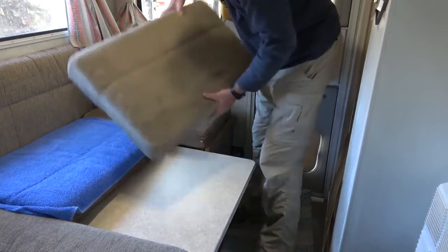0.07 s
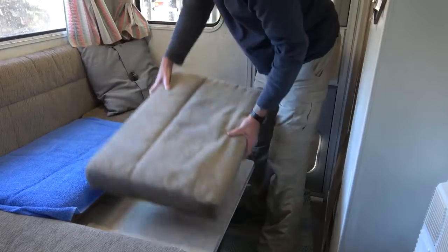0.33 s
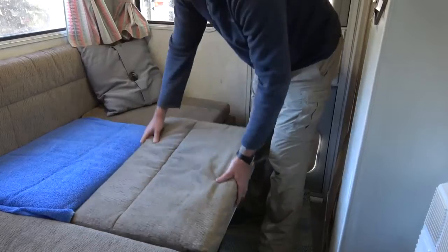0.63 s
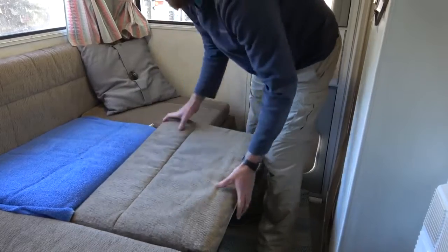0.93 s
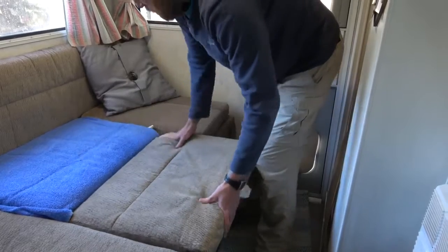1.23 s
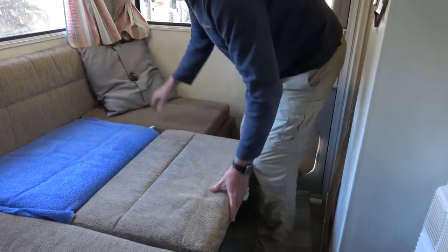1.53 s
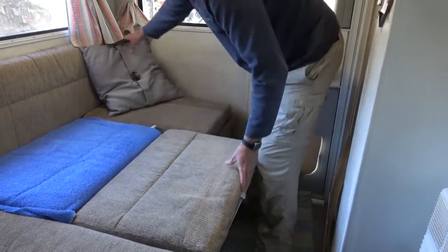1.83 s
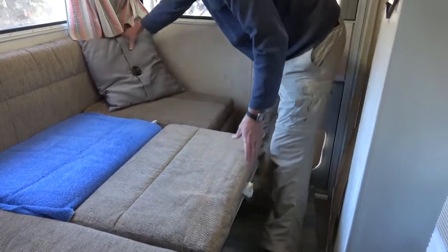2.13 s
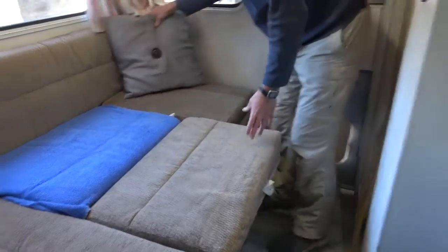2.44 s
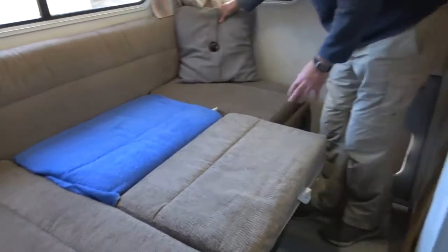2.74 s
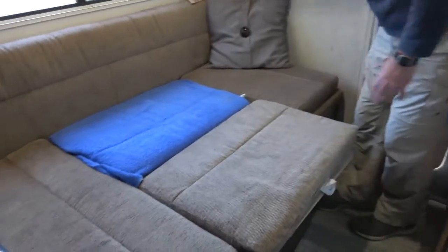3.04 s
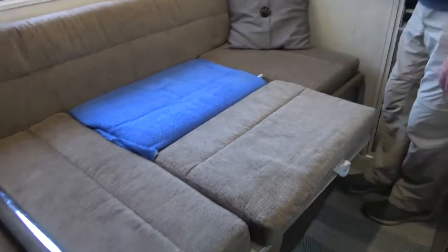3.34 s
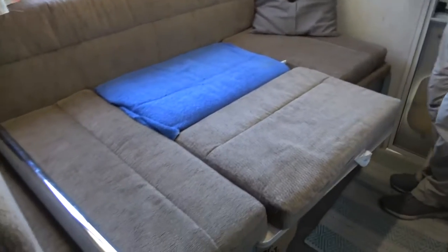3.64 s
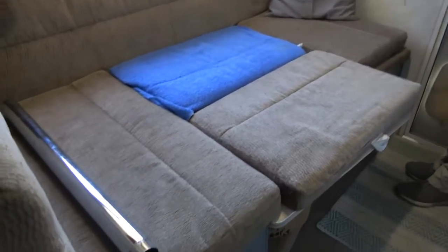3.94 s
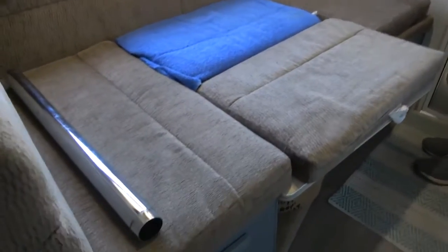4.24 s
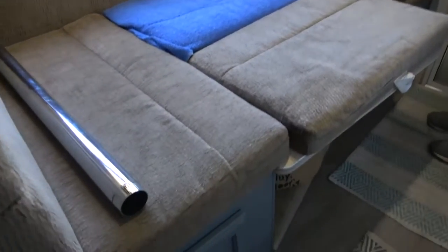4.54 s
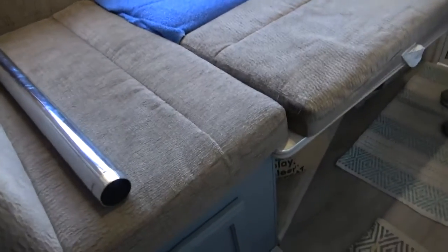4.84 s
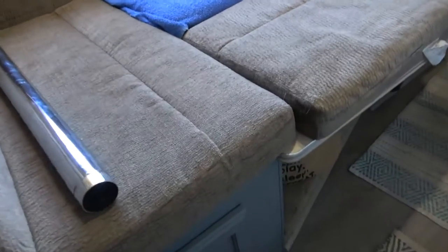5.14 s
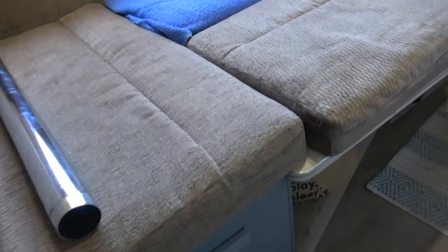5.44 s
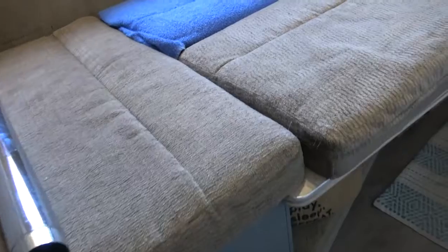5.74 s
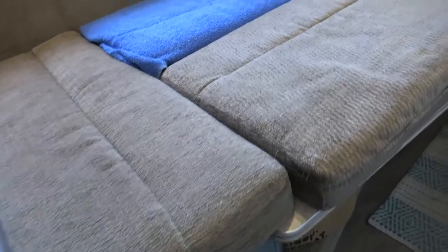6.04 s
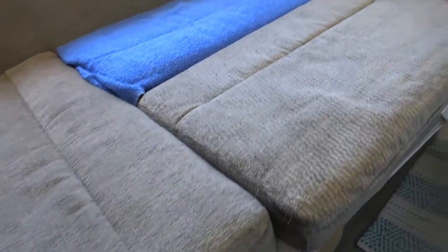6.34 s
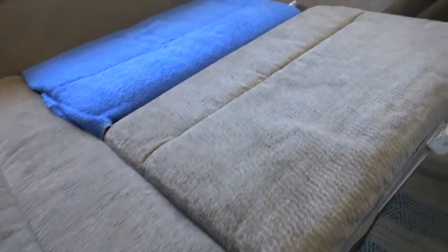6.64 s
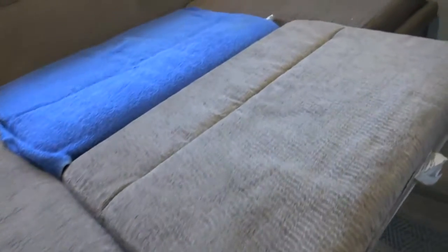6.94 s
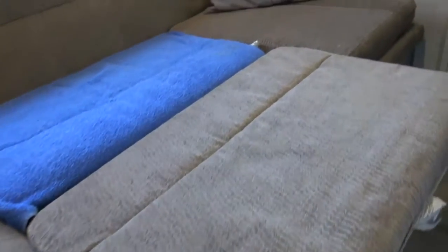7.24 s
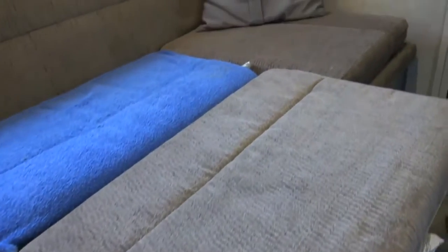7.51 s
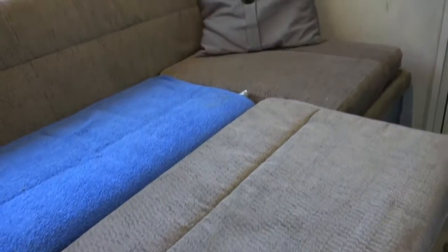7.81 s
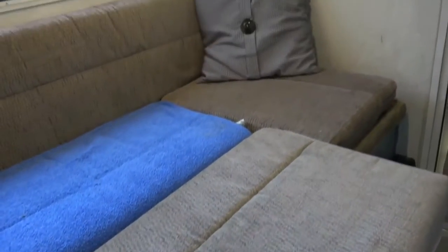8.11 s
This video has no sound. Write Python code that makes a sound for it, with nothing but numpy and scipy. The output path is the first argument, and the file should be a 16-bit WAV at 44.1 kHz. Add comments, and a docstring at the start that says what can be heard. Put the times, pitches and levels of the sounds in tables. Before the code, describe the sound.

A faint whirr and soft hiss run throughout in a small, padded camper cabin, with sounds close and almost dry. A light tap comes at 0.3 seconds. From 0.6 to 1.5 seconds a cushion is laid on a table board and patted flat, with muffled bumps, fabric swishes and a low rumble. A click precedes two loud plywood knocks around 2.5 seconds, each rattling slightly. Upholstery brushes, then another hard knock at 3.6 seconds is followed by a deep, hollow thud and smaller bumps. Between 4.3 and 5.4 seconds small fittings snap and click irregularly, with a couple of faint chirps. The floor creaks briefly under a foot at 5.4 seconds. A low floor thud lands at 6.2 seconds. Two sharp clicks come around 7.2 seconds, then a soft bump, a loud, boomy furniture knock at 7.6 seconds and a last faint swish.

```python
"""Plywood furniture knocks and rattles as seat cushions are laid on a table board and patted flat.
In the small, padded camper cabin, blows shake panel modes and weight swings the hollow floor and board.
Small fittings snap and ring, upholstery swishes, foam rumbles, the floor creaks under a foot
and rubbing parts chirp. Under it all lie a faint whirr and a soft hiss."""
import sys
import numpy as np
from scipy import signal
from scipy.fft import rfft, irfft, next_fast_len
from scipy.io import wavfile
from scipy.ndimage import map_coordinates

SR = 44100
rng = np.random.default_rng(int(sys.argv[2]) if len(sys.argv) > 2 else 0)


def store_wav(level_fs):
    """Save 16-bit WAV to argv[1]."""
    pcm = np.round(np.clip(np.atleast_2d(level_fs), -1, 1) * 32767)
    wavfile.write(sys.argv[1], SR, pcm.T.astype(np.int16))


N = 360297

# heavy blows on furniture: start_s, level_db, panel_hz, tilt_db_per_oct, rebound_db, rebound_hz,
# rattle_db, box_db, box_hz, pan_db (left over right)
SLAMS = [(2.447, -19, 796, 3, -12.5, 467, -34, -37, 65, -.5),
         (2.5956, -15, 396, 1, -21, 900, -35, -31.5, 65, -1.5),
         (3.5608, -16, 716, -2.5, -42.5, 400, -61, -30, 80, -1.5),
         (7.593, -16, 990, 1, -25, 560, -39.5, -20, 100.5, 1)]
SLAM_RISE_S = 0.0029
# padded bumps of hands and cushions: start_s, level_db, rise_s, panel_hz, tilt_db_per_oct
PATS = [(.716, -35, 0.012, 272, -24), (0.828, -35.5, 0.017, 400, -11.5), (1.246, -28, 0.024, 235, -4),
        (1.494, -32.5, 0.0054, 235, -35), (3.207, -41.5, 0.038, 273, -5), (3.728, -32, 0.017, 394, -14),
        (3.756, -34, .012, 433, 2), (4.21, -53.5, 0.013, 220, -12), (7.447, -35, 0.045, 424, -1),
        (7.47, -35, 0.017, 1410, 2)]


def amp(db):
    """Decibels to gain."""
    return 10 ** (np.asarray(db) / 20)


def unit(x):
    """Scale to rms 1."""
    return x / np.sqrt(np.mean(x ** 2) + 1e-20)


def along(points, hz):
    """Interpolate (freq_hz, value) points on a log axis."""
    freqs_hz, values = np.transpose(points)
    return np.interp(np.log(hz + 1), np.log(freqs_hz + 1), values)


def octaves_above(hz, corner_hz):
    """Octaves above a soft corner, 0 far below it."""
    return np.log2(np.hypot(1, hz / corner_hz))


def wobble(rate_hz):
    """Smooth random curve with knots at rate_hz."""
    knots = rng.standard_normal(int(N * rate_hz / SR) + 4)
    return map_coordinates(knots, [np.arange(N) * rate_hz / SR])


def resonance(hz, centre_hz, width_hz):
    """Gain of one resonance."""
    return hz * width_hz / np.hypot(centre_hz ** 2 - hz ** 2, hz * width_hz)


def noise(gain, size, spread=1):
    """Stereo noise of rms 1, coloured by gain(hz); spread parts the two sides."""
    likeness = [(100, 0.94), (700, 0.9), (2200, 0.97), (4500, 1), (8000, 0.65), (14000, 0.87)]  # left-right likeness: freq_hz, correlation
    n_fft = next_fast_len(size)
    hz = np.fft.rfftfreq(n_fft, 1 / SR)
    angle = spread * np.arccos(np.clip(along(likeness, hz), 0, 1)) / 2
    phases = np.exp(2j * np.pi * rng.random((2, len(hz))))
    mid, side = irfft(phases * gain(hz) * [np.cos(angle), np.sin(angle)], n_fft)[:, :size]
    return unit(np.array([mid + side, mid - side]))


def sine(t, hz):
    """Sine at a random phase."""
    return np.sin(2 * np.pi * (hz * t + rng.random()))


def strike(t, rise_s, t60_s):
    """Rise to 1, then decay."""
    return np.minimum(t / rise_s, 1) ** 0.85 * amp(-60 * np.maximum(t - rise_s, 0) / t60_s)


def add(track, start_s, sound, pan_db=0):
    """Mix into a stereo track; positive pan is left."""
    part = track[:, round(start_s * SR):][:, :sound.shape[-1]]
    part += (sound * amp([[pan_db / 2], [-pan_db / 2]]))[:, :part.shape[1]]


def filtered(x, gain):
    """Colour x by gain(hz)."""
    n_fft = next_fast_len(N + SR // 4)
    return irfft(rfft(x, n_fft) * gain(np.fft.rfftfreq(n_fft, 1 / SR)), n_fft)[:, :N]


def background(whirr_db=-58, air_db=-66, hiss_over_treble_db=3, grain_db=1):
    """Steady whirr in three broad resonances, quiet air and a grainy hiss that sinks unevenly."""
    whirr_bands = [(505, 230, -5), (765, 104, -1), (1174, 240, -5.5)]  # resonances: centre_hz, width_hz, level_db
    air_spectrum = [(20, 2.5), (150, -8), (400, -5), (1200, -19), (2000, -32), (6000, -15), (16000, -24.5)]  # freq_hz, density_db
    hiss_spectrum = [(40, -27), (140, 0.5), (260, 3.5), (500, -1.5), (1000, -2), (2200, -4), (4000, -7.5),
                     (7000, -8.5), (12000, -15), (16000, -22)]  # freq_hz, density_db
    hiss_treble = [(0.0, -54), (1.5, -58.5), (3.77, -54.5), (4.0, -60), (4.71, -58), (5.75, -66),
                   (6.67, -68), (8.17, -69.5)]  # time_s, level_db
    whirr = noise(lambda hz: sum(amp(db) * resonance(hz, centre_hz, width_hz) ** 2
                                 for centre_hz, width_hz, db in whirr_bands), N)
    air = noise(lambda hz: amp(along(air_spectrum, hz)), N, spread=2.9)
    hiss = noise(lambda hz: amp(along(hiss_spectrum, hz)), N) * unit(amp(grain_db * wobble(120)))
    hiss_db = hiss_over_treble_db + np.interp(np.arange(N) / SR, *np.transpose(hiss_treble))
    return amp(whirr_db) * whirr + amp(air_db) * air + amp(hiss_db) * hiss


def cabin_echo(x):
    """The padded cabin answers briefly, the bass lasting longest."""
    decay = [(100, 1), (1000, 0.065), (10000, 0.2)]  # freq_hz, t60_s
    hz, t, spectra = signal.stft(noise(np.ones_like, SR // 3), SR, nperseg=256)
    tail = signal.istft(spectra * amp(-60 * t / along(decay, hz)[:, None]), SR, nperseg=256)[1]
    return signal.fftconvolve(x, tail / np.linalg.norm(tail[0]), axes=1)[:, :N]


def foam_rumble(rise_s=0.052, t60_s=0.37, rest_db=-70.5, lump_db=3.5):
    """Foam and floor rumble under shifting weight; each shift rises, holds and dies away."""
    spectrum = [(20, -15.5), (45, 2.5), (75, -5), (108, 8.5), (135, -10.5), (220, -6), (400, -12),
                (900, -44)]  # freq_hz, density_db
    shifts = [(0, 0.15, -62), (.85, 0.16, -50.5), (1.076, .42, -54.5), (1.798, 0.31, -53), (2.694, .6, -61),
              (3.805, 0.14, -51), (5.37, 0.17, -46.5), (6.12, 0.25, -56), (7.483, 0.4, -60)]  # start_s, length_s, level_db
    t = np.arange(N) / SR
    envelope = amp(rest_db)
    for start_s, length_s, level_db in shifts:
        fall_db = 60 * np.maximum(t - start_s - length_s, 0) / t60_s
        envelope = envelope + np.clip((t - start_s) / rise_s, 0, 1) * amp(level_db - fall_db)
    rumble = noise(lambda hz: amp(along(spectrum, hz)), N)
    return envelope * rumble * unit(amp(lump_db * wobble(9.8)))


def cloth_strokes(grain_db=1.5):
    """The weave catches and slips in a fine grain; each stroke swells and fades with its speed."""
    spectrum = [(60, -6), (220, 3.5), (500, 1), (1000, -1), (2200, -5.5), (4000, -8), (7000, -9.5),
                (12000, -16), (16000, -26)]  # freq_hz, density_db
    strokes = [(.22, -53, .17, 0), (.66, -49, 0.039, 1.5), (0.767, -41.5, 0.044, -1.1),
               (0.918, -47.5, 0.043, 1), (1.259, -41, .05, -1), (1.534, -48.5, 0.063, 1),
               (1.911, -54.5, .098, 6), (2.863, -53.5, .06, -1), (2.999, -50.5, .018, .5),
               (3.217, -44, 0.032, -2), (3.412, -47, 0.059, -7), (3.659, -51, .13, 0),
               (6.14, -57, 0.067, -1.5), (7.018, -56, 0.012, 2), (7.966, -54, 0.044, 1)]  # cloth on cloth: peak_s, level_db, half_length_s, tilt_db_per_oct
    out = np.zeros((2, N))
    for peak_s, level_db, half_s, tilt in strokes:
        t = np.arange(-4 * half_s, 4 * half_s, 1 / SR)
        swish = noise(lambda hz: amp(along(spectrum, hz) + tilt * octaves_above(hz, 1000)), SR)
        envelope = amp(level_db) / np.cosh(t / half_s) ** 1.36
        add(out, peak_s + t[0], envelope[:SR] * swish[:, :len(t)])
    return out * unit(amp(grain_db * wobble(380)))


def squeaks(rise_s=0.008, t60_s=0.11, width_hz=250):
    """Brief, narrow chirps of friction."""
    chirps = [(.41, -57, 2300), (4.334, -52, 2640), (4.59, -56, 9900)]  # start_s, level_db, pitch_hz
    out, t = np.zeros((2, N)), np.arange(SR // 8) / SR
    for start_s, level_db, pitch_hz in chirps:
        band = noise(lambda hz: resonance(hz, pitch_hz, width_hz) ** 2, len(t))
        add(out, start_s, amp(level_db) * strike(t, rise_s, t60_s) * band)
    return out


def floor_creak(start_s=5.37, length_s=0.27, slip_hz=63, level_db=-50, rise_s=0.0017, low_cut_hz=55):
    """The floor sticks and slips unevenly under a foot, each slip ringing the board at new strengths."""
    modes = [(74, 22, -6), (156, 53, -6), (380, 56, -5.5), (730, 310, -10.5)]  # floor board: pitch_hz, width_hz, level_db
    jitter_s, scatter_db = 0.002, 2.6
    out, t = np.zeros((2, N)), np.arange(SR // 20) / SR
    slips_s = np.arange(start_s, start_s + length_s, 1 / slip_hz)
    for slip_s, (late, *strengths) in zip(slips_s, rng.standard_normal((40, 1 + len(modes)))):
        ring = 0
        for (hz, width_hz, db), strength in zip(modes, strengths):
            decay = width_hz * np.exp(-np.pi * width_hz * t)
            ring += amp(db + scatter_db * strength) * decay * np.sin(2 * np.pi * hz * t)
        slip = unit(ring * (1 - np.exp(-t / rise_s)))
        load = np.sin(np.pi * (0.47 + 0.45 * (slip_s - start_s) / length_s))  # the weight eases off
        add(out, slip_s + jitter_s * late, amp(level_db) * load * slip)
    return filtered(out, lambda hz: hz ** 2 / (hz ** 2 + low_cut_hz ** 2))


def fitting_clicks(t60_s=0.017, ring_db=-1, tail_db=-29, crest_db=8):
    """Small hard parts snap, ring briefly and leave a faint tail."""
    clicks = [(2.356, -23.5, 10.5, 3330), (4.384, -34.5, -7, 2930), (4.442, -15.5, 5, 2200),
              (4.8415, -24, 15, 2170), (5.012, -30, -1, 1480), (5.056, -35.5, 2, 1700),
              (5.0907, -22.5, 12, 3050), (5.1162, -23.5, -8, 1360), (5.2836, -16.5, 5.5, 2080),
              (5.3712, -31.5, 4.5, 1310), (7.1606, -28, 3.5, 1210), (7.2596, -19, 11.5, 1870)]  # start_s, peak_db, tilt_db_per_oct, ring_hz
    spectrum = [(100, 4), (500, -6), (1200, 6), (2100, 3), (3600, 1.5), (5500, -6.5), (8500, -9.5),
                (12000, -13.5), (16000, -32)]  # freq_hz, density_db
    modes = [(780, -9), (1250, -11), (2050, -8), (2750, -12), (3500, -6.5), (8300, -14.5), (11500, -24)]  # pitch_hz, level_db
    out, t = np.zeros((2, N)), np.arange(SR // 5) / SR
    for start_s, peak_db, tilt, ring_hz in clicks:
        treble_db = lambda hz: tilt * octaves_above(hz, 4000)
        snap = noise(lambda hz: amp(along(spectrum, hz) + treble_db(hz)), len(t))
        snap *= strike(t, 0.00018, t60_s) + amp(tail_db) * strike(t, rise_s=0.0062, t60_s=0.23)
        ring = unit(sum(amp(db + treble_db(hz)) * sine(t, hz) for hz, db in [(ring_hz, 0), *modes]))
        ring *= amp(ring_db) * strike(t, 0.00016, 0.75 * t60_s)
        add(out, start_s, amp(peak_db - crest_db) * (snap + ring))
    return out


def swings(table_hz=74, table_db=-6.5, table_t60_s=0.19):
    """Low swings of floor, table board and furniture boxes: start_s, level_db, pitch_hz, t60_s."""
    landings = [(0.63, -44, 75.5), (1.273, -29.5, 64.5), (3.677, -15.5, 97), (3.867, -47, 96),
                (4.445, -43, 109), (4.645, -42, 108), (4.762, -44.5, 109), (6.226, -22.5, 106),
                (6.262, -28.5, 116), (6.292, -30.5, 94), (6.383, -44, 102), (7.162, -46.5, 83)]  # weight on hollow floor and boards: start_s, level_db, pitch_hz
    box_modes = [(.45, -7.5, 0.49), (0.999, 0.5, 0.14), (1.9, -7.5, 0.17)]  # pitch_ratio, level_db, t60_s
    for start_s, level_db, pitch_hz in landings:
        t60_s = 0.13 * amp(0.39 * max(-28 - level_db, 0))  # hard swings are damped sooner
        yield start_s, level_db, pitch_hz, t60_s
    for start_s, level_db, rise_s, panel_hz, _ in PATS:
        loss_db = 20 * np.log10(1 + (panel_hz / 570) ** 2)  # small, high panels hardly move the table
        yield start_s + rise_s / 2, level_db + table_db - loss_db, table_hz, table_t60_s
    for start_s, *_, box_db, box_hz, _ in SLAMS:
        for ratio, mode_db, t60_s in box_modes:
            yield start_s + SLAM_RISE_S, box_db + mode_db, ratio * box_hz, t60_s


def thuds(rise_s=0.009, boom_db=-10):
    """A heavy, soft push swings a hollow box, with a dull boom around its pitch."""
    out, t = np.zeros((2, N)), np.arange(SR // 2) / SR
    for start_s, level_db, pitch_hz, t60_s in swings():
        boom = noise(lambda hz: resonance(hz, 0.61 * pitch_hz, 1.94 * pitch_hz) ** 3, len(t), spread=0.6)
        swing = np.sin(2 * np.pi * pitch_hz * t) + amp(boom_db) * boom
        add(out, start_s, amp(level_db) * strike(t, rise_s, t60_s) * swing, pan_db=1)
    return out


def contacts(tap_rise_s=0.0018, rebound_delay_s=0.012, rattle_delay_s=0.085):
    """Contacts with panels: start_s, level_db, rise_s, t60_s, panel_hz, tilt_db_per_oct, pan_db."""
    taps = [(.3035, -36.5, 0.06, 378, -5), (.624, -42.5, .16, 586, -10), (1.274, -26.5, 0.045, 450, 1.5),
            (3.548, -33, 0.18, 900, -6), (3.675, -28, 0.13, 483, -25), (3.729, -31, 0.082, 1480, 4.5),
            (3.863, -34, 0.11, 765, -4), (5.073, -35, 0.033, 324, -8), (5.199, -47.5, .14, 353, -16),
            (5.518, -38.5, 0.17, 400, -5), (6.194, -44.5, 0.15, 1930, 6), (6.22, -39, 0.37, 440, -5),
            (7.16, -38.5, 0.11, 686, -3), (7.661, -30, 0.19, 310, -2.5)]  # light, hard taps, and the dull knocks of heels landing at 3.675 and 6.22 s: start_s, level_db, t60_s, panel_hz, tilt_db_per_oct
    for start_s, level_db, panel_hz, tilt, rebound_db, rebound_hz, rattle_db, *_, pan_db in SLAMS:
        yield start_s, level_db, SLAM_RISE_S, 0.11, panel_hz, tilt, pan_db
        yield start_s + rebound_delay_s, rebound_db, 0.0067, 0.15, rebound_hz, -0.5, pan_db
        yield start_s + rattle_delay_s, rattle_db, 0.025, 0.22, 684, 1.7, pan_db
    for start_s, level_db, t60_s, panel_hz, tilt in taps:
        yield start_s, level_db, tap_rise_s, t60_s, panel_hz, tilt, 0
    for start_s, level_db, rise_s, panel_hz, tilt in PATS:
        t60_s = 0.043 + 4.8 * rise_s  # softer bumps last longer
        yield start_s, level_db, rise_s, t60_s, panel_hz, tilt, 0


def panel_knocks(panel_db=7, width_ratio=0.27, ring_db=-6, scatter_db=1.5):
    """Each blow shakes dense panel modes, the strongest ringing out; padding dulls and slows it."""
    spectrum = [(40, -20), (120, -6.5), (220, 3.5), (450, -3), (1000, -7.5), (2000, -9.5), (3500, -19),
                (6500, -26), (10000, -36), (16000, -50)]  # freq_hz, density_db
    modes = [(236, -3, 0.27), (374, -3, 0.2), (435.6, 2.5, 0.15), (745.7, 0.5, 0.13), (900, -9, 0.16),
             (1044, 1.5, 0.12), (1240, 0, 0.13), (1392, -10.5, 0.17), (1720, -1.5, 0.09),
             (1850, -21, 0.085), (2260, -38, 0.085), (2410, -27, 0.1), (2750, -14, 0.22),
             (2900, -22, 0.053)]  # plywood panels: pitch_hz, level_db, t60_s
    out, t = np.zeros((2, N)), np.arange(SR // 4) / SR
    for start_s, level_db, rise_s, t60_s, panel_hz, tilt, pan_db in contacts():
        panel = lambda hz: 1 + amp(panel_db) * resonance(hz, panel_hz, width_ratio * panel_hz) ** 2
        radiation = lambda hz: hz / np.hypot(hz, 0.14 * panel_hz)  # small panels radiate little bass
        colour = lambda hz: amp(tilt * octaves_above(hz, 700)) * panel(hz) * radiation(hz)
        shake = noise(lambda hz: amp(along(spectrum, hz)) * colour(hz), len(t), spread=0.83)
        blow = shake * strike(t, rise_s, t60_s)
        ring = 0
        for hz, mode_db, mode_t60_s in modes:
            gain = amp(mode_db + rng.normal(0, scatter_db)) * colour(hz) / np.sqrt(panel(hz))
            ring += gain * strike(t, rise_s, mode_t60_s) * sine(t, hz)
        add(out, start_s, amp(level_db) * (blow + amp(ring_db) * unit(ring) * np.std(blow)), pan_db)
    return out


def scene(echo_db=-23):
    """Blows and their echo, close clicks, friction sounds and background."""
    lean = [(60, 1), (150, 1.5), (500, -1), (1200, -3), (4000, -1), (12000, 0)]  # left-right balance of the blows, bass left, mids right: freq_hz, pan_db
    blows = filtered(panel_knocks() + thuds(), lambda hz: amp(np.outer([0.5, -0.5], along(lean, hz))))
    impacts = blows + amp(echo_db) * cabin_echo(blows) + fitting_clicks()
    return impacts + floor_creak() + squeaks() + foam_rumble() + cloth_strokes() + background()


def record(dry):
    """Brick-wall low-pass at 16 kHz."""
    return filtered(dry, lambda hz: hz < 16000)


dry = scene()
out = record(dry)
store_wav(out)
```